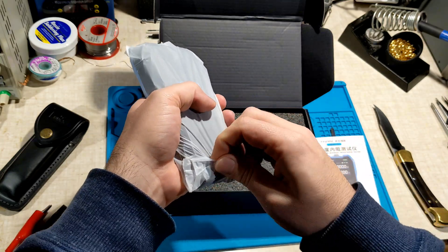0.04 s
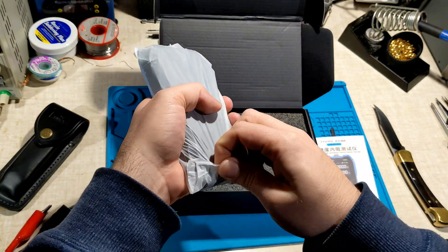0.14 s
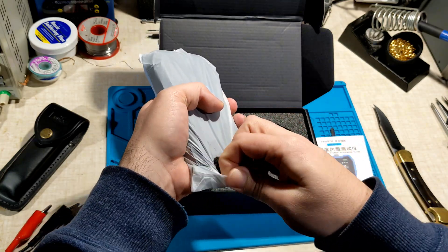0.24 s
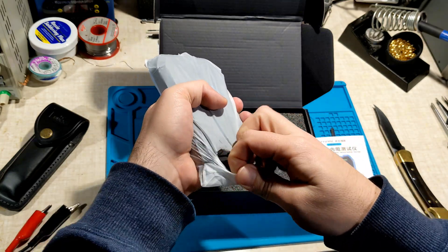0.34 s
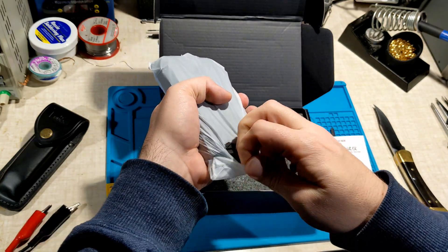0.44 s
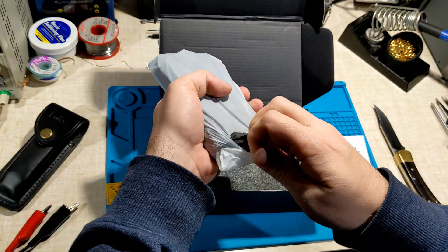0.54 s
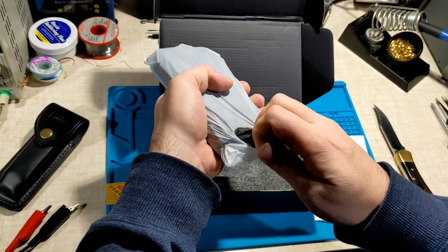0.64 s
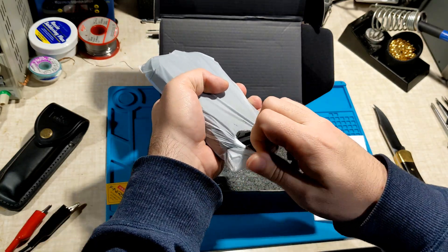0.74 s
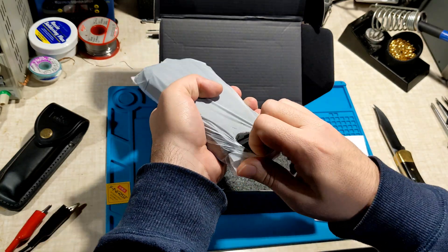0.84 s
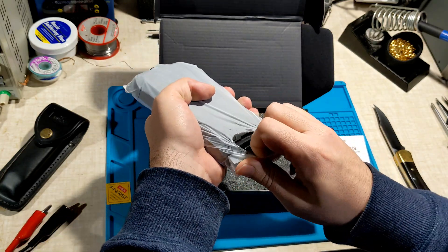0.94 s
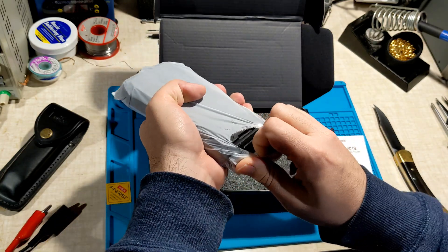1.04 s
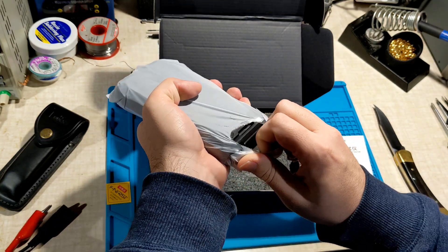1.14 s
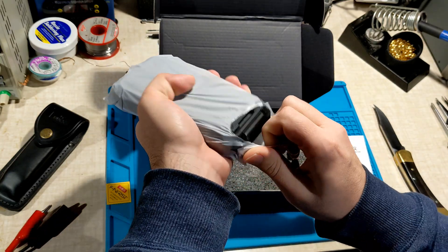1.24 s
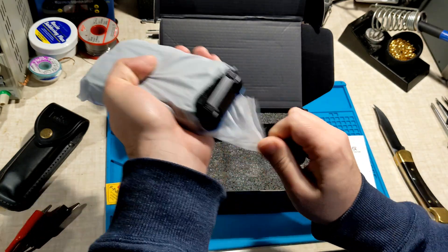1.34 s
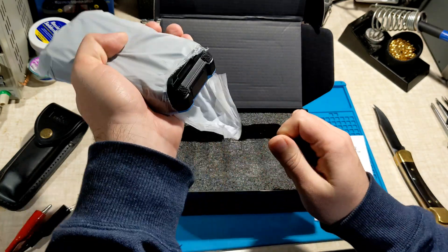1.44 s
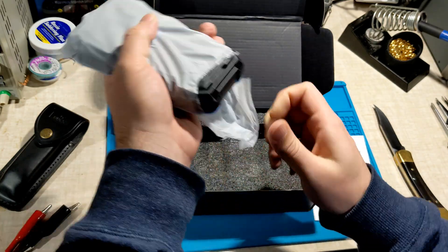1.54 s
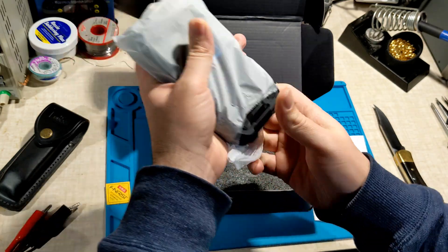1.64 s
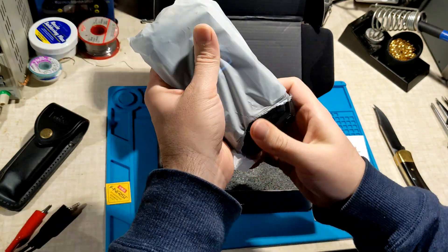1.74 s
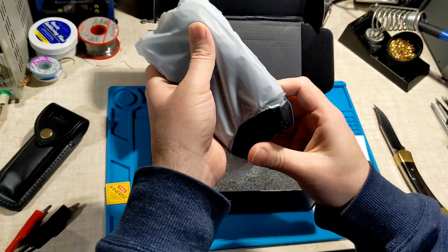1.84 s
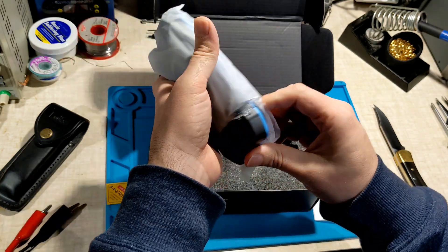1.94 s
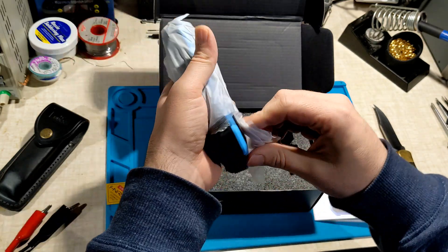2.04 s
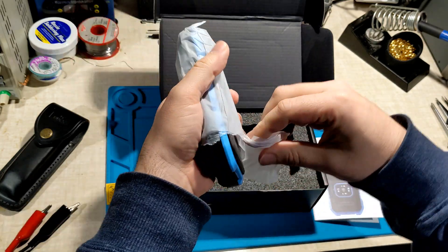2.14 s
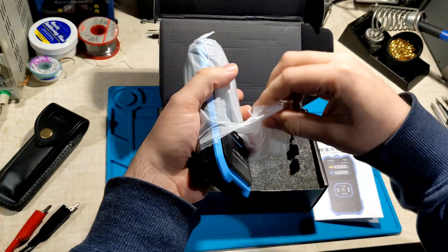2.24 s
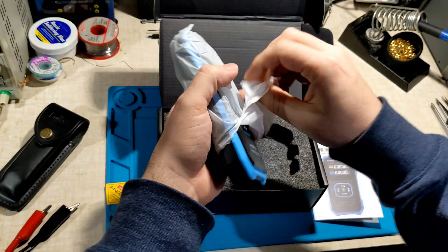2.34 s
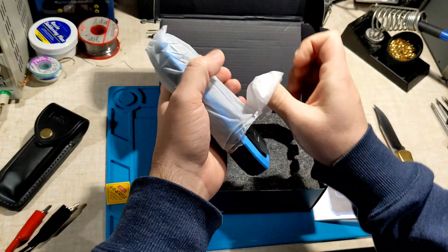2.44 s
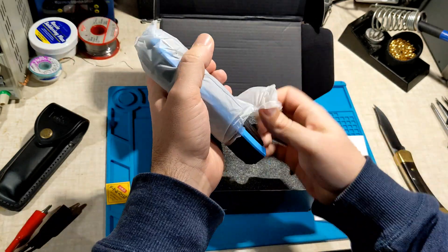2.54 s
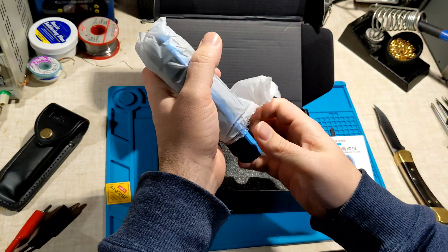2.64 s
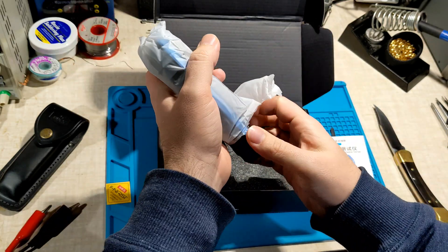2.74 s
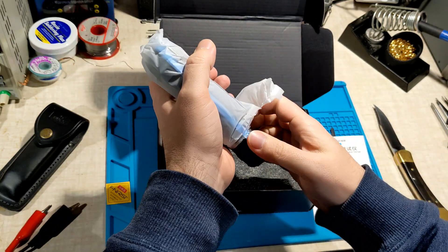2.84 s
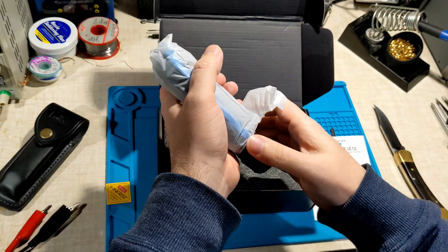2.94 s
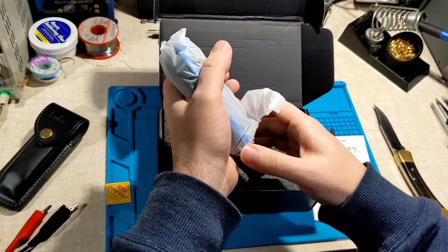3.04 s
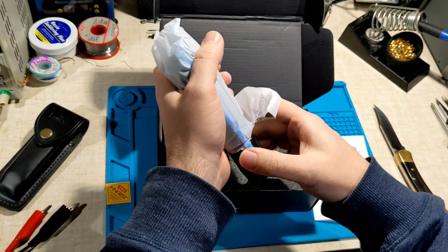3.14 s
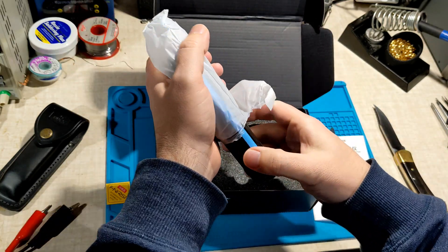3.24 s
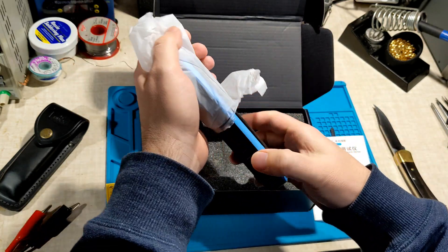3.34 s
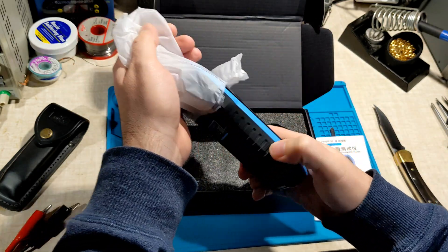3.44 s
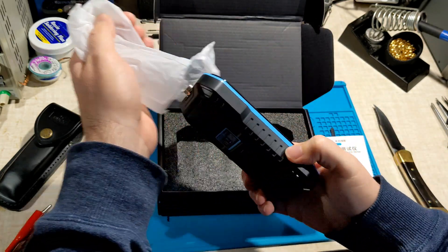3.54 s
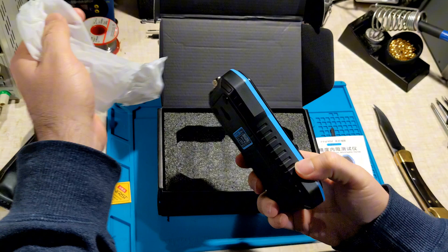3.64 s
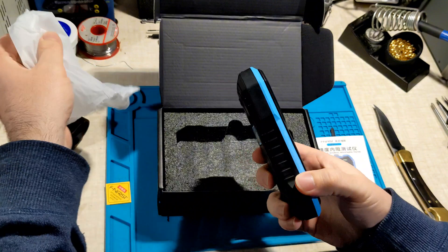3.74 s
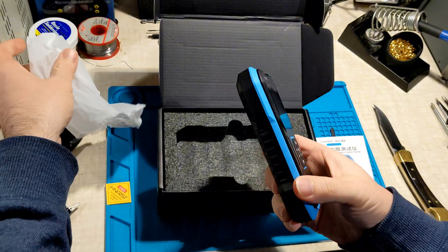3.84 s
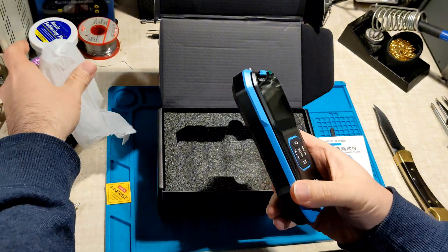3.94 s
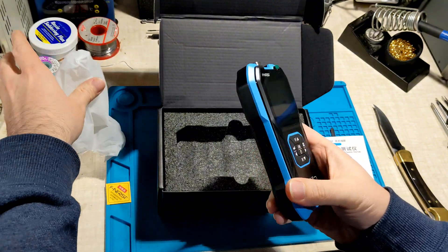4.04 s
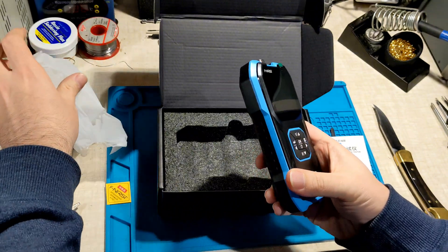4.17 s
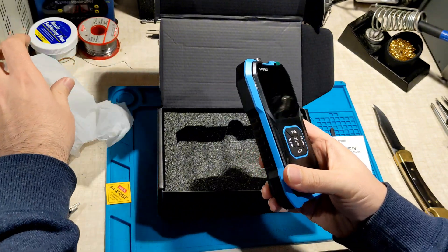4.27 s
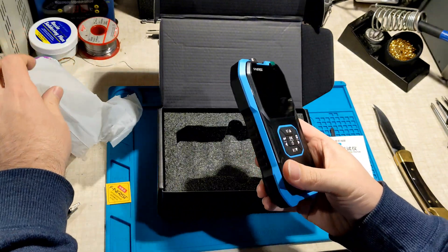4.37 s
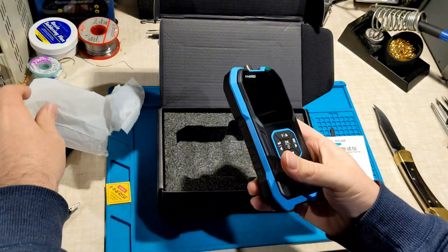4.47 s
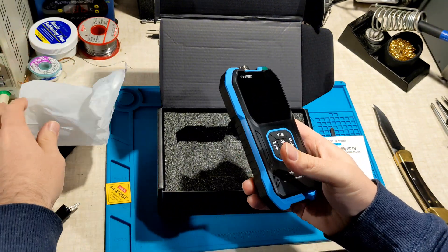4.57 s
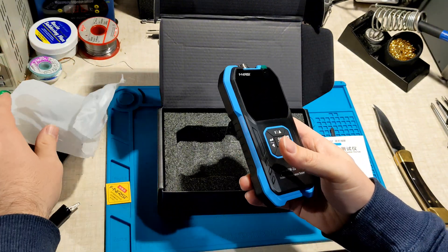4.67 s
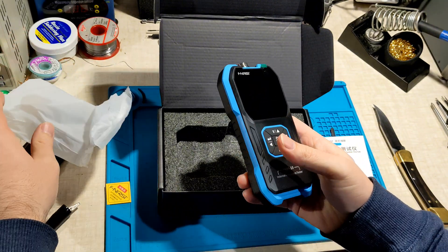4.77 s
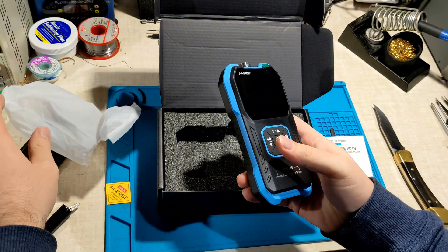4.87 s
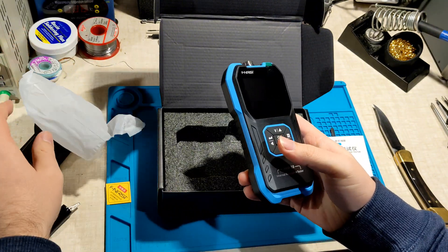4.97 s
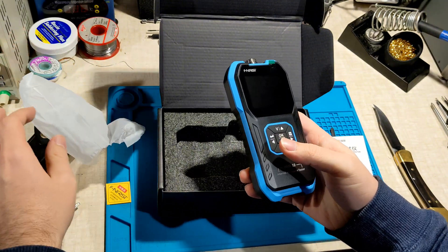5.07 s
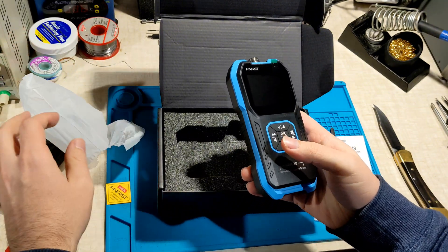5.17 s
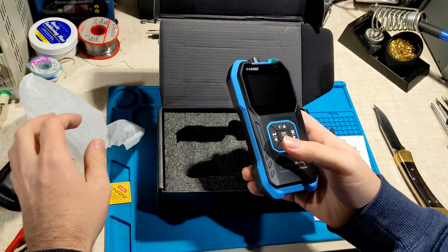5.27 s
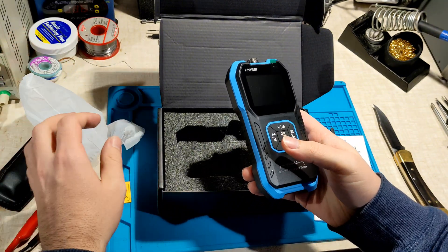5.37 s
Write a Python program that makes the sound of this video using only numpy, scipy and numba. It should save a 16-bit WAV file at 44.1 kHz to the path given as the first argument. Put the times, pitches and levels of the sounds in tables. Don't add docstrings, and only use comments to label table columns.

```python
import sys
import numpy as np
from scipy import signal
from scipy.fft import rfft, irfft, next_fast_len
from scipy.io import wavfile
from scipy.ndimage import uniform_filter1d, map_coordinates
from numba import njit

SR = 44100
rng = np.random.default_rng(int(sys.argv[2]) if len(sys.argv) > 2 else 0)


def makeup_ratio(level_db):
    decades = np.asarray(level_db, float) / 20
    return 10 ** decades


def store_pcm(level_fs):
    pcm = np.round(np.clip(level_fs, -1, 1) * 32767).astype(np.int16)
    wavfile.write(sys.argv[1], SR, np.atleast_2d(pcm).T)


N = 238581
TIME = np.arange(N) / SR

# [f/Hz, level per Hz/dB]
AIR = [(150, -8), (300, -1), (550, 0), (1000, -2), (2200, -1), (7000, -3), (10500, -7), (14000, -4)]
# [t/s, rumble level/dB, drumming level/dB]
LEAN = [(0, -71, -68), (.55, -71.5, -79), (1.05, -80.5, -84.5), (3.1, -80, -82.5), (3.5, -78, -73.5),
        (4.15, -78, -74), (4.3, -79.5, -84), (5.41, -80.5, -80)]
# [f/Hz, width/Hz, level/dB]
BOX = [(218, 25, 2.5), (506, 31, 4), (635, 19, -15), (845, 62, -3.5), (1310, 60, -21), (2250, 30, -8)]
# [t/s, peak level/dB, f/Hz, t60/s]
POPS = [(0.0623, -56, 2230, 0.024), (0.315, -31, 2250, 0.027), (0.3473, -38, 1860, 0.032),
        (0.5905, -37, 1280, 0.035), (1.4177, -28, 1993, 0.06), (2.2712, -39, 2080, 0.053),
        (2.348, -32.5, 1820, 0.027), (2.6274, -38, 2240, 0.021), (3.796, -44.5, 1310, 0.046),
        (3.8353, -43.5, 1356, 0.049), (4.542, -51, 1980, 0.037), (4.5793, -46.5, 2280, 0.042),
        (4.7326, -41, 2244, 0.045), (5.0255, -56, 2330, 0.021)]
# [t/s, peak level/dB, f/Hz, t60/s]
KNOCKS = [
    (0.348, -47, 630, 0.087),
    (0.59, -45, 805, 0.05),
    (1.418, -28, 623, 0.014),
    (1.734, -39, 504, 0.032),
    (2.224, -46, 507, 0.094),
    (2.25, -52, 586, 0.068),
    (2.274, -42, 623, 0.059),
    (2.309, -43, 686, 0.064),
    (2.344, -41.5, 656, 0.044),
]
# [t/s, peak level/dB, f/Hz, t60/s]
MORE_POPS = [(0.259, -49, 2230, 0.025), (0.288, -35, 4020, 0.025), (0.313, -35, 3070, 0.018),
             (0.591, -43, 1050, 0.034), (0.671, -55, 2476, 0.023), (0.771, -50, 4000, 0.025),
             (0.773, -44, 2500, 0.027), (0.858, -42, 3370, 0.023), (0.865, -51, 635, 0.03),
             (0.972, -52, 1328, 0.033), (1.33, -36, 4700, 0.025), (1.361, -29, 1900, 0.02),
             (1.795, -38.5, 2090, 0.027), (1.951, -44.5, 500, 0.021), (2.035, -59, 520, 0.025),
             (2.155, -37.5, 3650, 0.025), (2.222, -48, 535, 0.025), (2.381, -51, 537, 0.06),
             (2.579, -39, 4314, 0.025), (2.791, -55, 3000, 0.025), (2.882, -48, 3500, 0.028),
             (2.916, -49, 3340, 0.04), (2.916, -54, 2380, 0.03), (2.972, -52, 1310, 0.023),
             (3.095, -46, 4730, 0.025), (3.149, -45.5, 2361, 0.033), (3.416, -33.5, 2700, 0.025),
             (3.513, -32, 3120, 0.024), (3.53, -40, 1770, 0.043), (3.626, -48, 4450, 0.025),
             (3.682, -57, 1310, 0.035), (3.773, -54.5, 1380, 0.032), (3.775, -34.5, 4810, 0.028),
             (4.008, -51.5, 1787, 0.033), (4.114, -55, 4700, 0.031), (4.311, -60, 1328, 0.025),
             (4.31, -52, 4620, 0.028), (4.31, -53.5, 2350, 0.034), (5.026, -66, 2030, 0.025),
             (2.189, -51, 575, .03), (2.208, -44, 573, 0.027), (2.35, -40, 910, 0.026),
                (2.34, -37, 767, 0.029), (1.419, -46.5, 253, 0.15), (3.297, -35, 2970, .015),
                (3.494, -34, 3060, 0.021), (3.819, -44, 1470, 0.03), (3.929, -56.5, 520, 0.024),
                (3.947, -55, 1780, .025), (3.9766, -57, 1590, 0.027), (4.0546, -55, 1760, .025),
                (4.557, -57, 3200, .015), (4.565, -55, 840, 0.026), (4.812, -58, 3180, 0.022),
                (4.84, -59, 3160, .02)]
# [f/Hz, level per Hz/dB]
FILM = [(71, -53), (120, -19.5), (237, -19), (440, -15.5), (640, -13.5), (1040, -18), (1330, -8),
        (1560, -9.5), (2190, -3), (6100, -5), (7080, 0), (8000, -1.5), (10600, -4), (11700, 1.5),
        (15500, 2), (16500, -56)]
RANGE_BORDERS = (1050, 4000, 8500)
PORT_BALANCE = (-2.5, 1.5, -2.3, 2.5)
# [t/s, crackle level/dB]
GRIP = [(0, -58.5), (.7, -57.5), (1.13, -60), (1.25, -66.5), (1.55, -61), (2.76, -65), (3.12, -58.5),
        (3.66, -58.5), (4.15, -78), (4.29, -70), (4.69, -75), (5.0, -72), (5.1, -83), (5.41, -85)]
# [t/s, hold/s, crackle level/dB, stiff folds share/dB, wrapped object share/dB]
PULLS = [(.3, 0.049, -42, -2, -7.5), (1.323, 0.029, -33, -15, -26), (1.355, 0.026, -31.5, -12, -10.5),
         (1.419, 0.0039, -37.5, -4.5, -4), (1.47, 0.03, -51.5, -14, -16), (1.596, 0.0078, -34, -10.5, -25),
         (1.65, 0.073, -39, -11.5, -16.5), (1.715, 0.062, -35.5, -12.5, -19),
         (1.82, 0.051, -42.5, -7.5, -15), (1.9, 0.076, -38, -7.5, -22.5), (2.005, 0.079, -40, -8, -15.5),
         (2.135, 0.078, -45, -8.5, -13.5), (2.195, 0.074, -42, -6, -13.5), (2.275, 0.09, -37, -6, -15.5),
         (2.385, 0.052, -41, -10, -13.5), (2.45, 0.082, -39, -8, -19.5), (2.59, 0.058, -45, -9, -17.5),
         (3.17, 0.023, -37.5, -18.5, -31), (3.205, 0.16, -36.5, -14, -30.5),
         (3.38, 0.096, -35.5, -11.5, -27.5), (3.5, 0.044, -37.5, -9, -23.5),
         (3.56, 0.029, -46.5, -3.5, -15)]
# [t/s, hold/s, crackle level/dB, stiff folds share/dB, wrapped object share/dB]
FUMBLES = [(.06, 0.018, -50, 5.5, -4.5), (.15, 0.071, -54.5, -2, -4.5), (.44, 0.025, -49.5, -9.5, -28),
           (.5, 0.12, -58.5, 2.5, -1), (.775, 0.022, -64, -5, -20), (.85, 0.11, -58.5, -0.5, -5),
           (1.16, 0.022, -60.5, -3.5, -8.5), (2.8, 0.012, -49, -8, -45), (2.91, 0.096, -51, -16, -32),
           (3.72, 0.044, -56.5, -4, -22), (3.79, 0.081, -49.5, -5.5, -23), (3.9, 0.18, -58, -5, -16.5),
           (4.147, 0.0064, -58, 1, -12), (4.45, 0.039, -61, -19, -12.5), (4.54, 0.028, -53, -3.5, -13),
           (4.6, 0.048, -74.5, 6, -3), (4.71, 0.023, -61.5, -1.5, -26), (4.75, 0.09, -76.5, 7, -11),
           (5.03, 0.026, -66, -22, -9.5)]
# [t/s, hold/s, crackle level/dB, stiff folds share/dB, wrapped object share/dB]
SHIFTS = [
    (0.426, .03, -64, 3, -16),
    (0.814, 0.043, -54, -20, -6.5),
    (1.74, 0.028, -37, -24, -35),
    (2.03, 0.025, -41.5, -7, -29),
    (2.251, 0.017, -36, -14, -11),
    (2.669, 0.056, -52, -8.5, -14),
    (2.876, 0.0091, -54, -5, -38),
    (3.99, 0.017, -57, -20, -25),
    (4.52, 0.028, -61, -17, -23),
    (4.81, 0.033, -77, 3.5, -4),
]
# [t/s, half length/s, level/dB]
LULLS = [(0.565, 0.01, -7), (0.758, .009, 3.5), (0.864, 0.027, -4.5), (1.106, .01, -6), (1.222, 0.012, -8),
         (1.255, .015, -3), (1.401, 0.0063, 3), (1.432, .005, -3), (1.576, 0.0083, -7),
         (1.654, 0.013, -4.5), (1.812, 0.013, -5.5), (1.85, 0.022, -2.5), (2.103, 0.011, -9.5),
         (2.367, 0.0081, -12), (2.418, 0.0078, -3.5), (2.203, 0.003, -7), (2.534, 0.049, 1),
         (3.658, 0.024, -2), (4.683, .015, -2)]
# [t/s, finest film peak level/dB, film share/dB, stiff folds share/dB]
PICKING = [(0.0294, -35, -1.5, -10), (0.062, -26.5, -26, -4.5), (0.1062, -31, -12, -18),
           (0.139, -35.5, -17, -2.5), (0.2486, -32, 1, -2), (0.2611, -33.5, 1, -3), (0.2883, -31, 2, -15),
           (0.316, -25, -3, -7), (0.399, -32.5, -14, -18), (0.5318, -37.5, -13, 0),
           (0.551, -31.5, -23, -2.5), (0.575, -34.5, -13, 0), (0.5903, -23.5, -11, -15),
           (0.621, -40, -1, -8), (0.6461, -34.5, -3, -13), (0.7021, -37, -8, -10), (0.7286, -33.5, -6, -17),
           (0.7725, -26, -7, -15), (0.856, -38, 0, -8), (0.865, -32, -12, -24), (0.887, -37.5, -10, -17),
           (0.9029, -31.5, -3, -10), (0.936, -37, -14, -2.5), (0.949, -34.5, -4, -11),
           (0.971, -39, -5, -21), (1.0324, -37, -19, -12), (1.079, -37.5, -4, -19),
           (1.1177, -29.5, -10.5, -27), (1.16, -44, -13, -1.5), (1.1718, -39.5, -1, -13.5)]
# [t/s, finest film peak level/dB, film share/dB, stiff folds share/dB]
TEARING = [(1.193, -43.5, 3, -27), (1.2460, -32.5, -12.5, -19), (1.2976, -33, -27, -16),
           (1.716, -25, -11, -20), (1.3300, -21, -14, -15), (1.355, -14, -26, -34), (1.4032, -13, -25, -26),
           (1.4192, -19, -3, -6), (1.4206, -13.5, 0, -9), (1.5457, -45.5, -6, -1.5), (1.589, -32, -14, -23),
           (1.5966, -18.5, -24, -12), (1.604, -18, -29, -17), (1.6868, -29.5, -18, -7),
           (1.7038, -18.5, -16, -13), (1.836, -37, 4, -10), (1.8906, -27, -19, -17), (1.915, -49, 0, -7),
           (1.9611, -25, 1, -7), (2.065, -29, 8, -8), (2.127, -34, -4, -26), (2.138, -26, -13, -24),
           (2.1866, -28, 2, -19), (2.2215, -22.5, -5, -23), (2.239, -22.5, -5, -21), (2.2693, -18, -6, -20),
           (2.4212, -25, -0.5, -9.5), (2.4626, -34, 6, -31), (2.58, -27.5, -3, -18),
           (2.629, -21.5, -24, -15), (2.716, -32, -10, -22)]
# [t/s, finest film peak level/dB, film share/dB, stiff folds share/dB]
LAYING = [(2.7902, -34, 3, -14), (2.8212, -29.5, -13, -26), (2.828, -22.5, -31, -23), (2.901, -42, -4, -28),
          (2.925, -35, -1, -28), (2.9699, -35.5, -33, -5), (2.9945, -31.5, -17, -27),
          (3.0078, -26.5, -26, -21), (3.093, -34.5, -10, -31), (3.1663, -50, -12, -6),
          (3.5142, -21, -25, -19), (3.627, -49, 6, 0), (3.6991, -34, 0.5, -38), (3.773, -43, 6, 3),
          (3.795, -29, -16, -22), (3.8182, -47, -7, -4), (3.8312, -35, 1, -4.5), (3.928, -46.5, 2, -4),
          (3.9759, -45, 1, -10), (4.1117, -51, 13, 6.5), (4.1424, -44, 5.5, -5.5), (4.311, -41.5, -6, -14),
          (4.429, -47, -18, -9), (4.444, -39.5, -16, -10.5), (4.541, -41, -17, -6), (4.5822, -45, -6, -3),
          (4.61, -46, 0, -2), (4.7002, -43, -23, -8), (5.0266, -56, 0, 4)]
# [t/s, finest film peak level/dB, film share/dB, stiff
# folds share/dB]
MORE_SNAPS = [(0.2754, -32, -8, -4), (0.3224, -20, -17, -26), (0.753, -41, -17, 0), (0.819, -43, -15, -20),
              (1.013, -45, 1, -5), (1.1326, -37, -8, -23), (1.491, -38, -19, -9.5), (1.75, -19, -10, -25),
              (1.7947, -40.5, 13, -4), (1.849, -33.5, -15, -5), (1.9251, -37, 1, 2.5), (2.0014, -30, -20, -17),
              (2.048, -33.5, 5, -5), (2.2044, -25.5, -1, -15), (2.334, -29, -3, -5), (2.3503, -26, -2, -3),
              (2.3545, -27.5, -4, -14), (0.7315, -37, -6, -15), (0.779, -31, -10, -8), (3.3088, -33, -14, -9),
              (3.3934, -25, -14, -15), (3.4459, -18, -21, -13), (3.492, -21.5, -20, -17), (4.237, -62, 9, 7),
              (4.3576, -60, -10, 1), (5.0645, -50.5, -14, -5),
              (0.0546, -28, -21, -23), (0.1194, -44, -18, -15), (0.3045, -36, -17, 5), (0.3608, -27.5, -9, -20),
               (0.6254, -45, -1, -13), (0.777, -32, -11, -7.5), (0.9085, -43, -7, -3), (0.9189, -58, -4, -10),
               (0.9751, -32.5, -7, -10), (1.211, -55, 4, -3), (1.371, -21, -18, -17), (1.514, -47, 3, -17),
               (1.527, -50.5, 1, 2), (1.669, -30, -17, -18), (1.713, -27, -20, -12), (1.732, -26, -18, -9),
               (2.018, -24, -17, -15), (2.29, -25, -4, -11), (2.473, -31, -1, -23), (2.479, -26.5, 1.5, -20),
               (2.6396, -27.5, -26, -5), (3.208, -35, -13, -16), (3.298, -39, -4, -8), (3.323, -32, -4, -5),
               (3.405, -43, -11, -16), (3.417, -28, -9, -7), (3.46, -33, -8, -10), (3.472, -33, -8, -18),
               (3.543, -33, -14, -15), (4.148, -51, 4, -2), (4.674, -57, -6, 3), (4.788, -65, -6, 3)]

PLACE_DB = -1
PORT_LAG, PORT_OFFSET = 5., -3.


def level(x, db):
    return x * makeup_ratio(db) / np.sqrt(np.mean(x ** 2))


def band(x, lo_hz, hi_hz):
    return signal.sosfilt(signal.butter(2, [lo_hz, hi_hz], "bandpass", fs=SR, output="sos"), x)


def colour(x, points):
    size = next_fast_len(N)
    spec, (hz, db) = rfft(x, size), np.transpose(points)
    own = uniform_filter1d(np.mean(abs(spec) ** 2, axis=0), size=2000)
    bin_hz = np.arange(spec.shape[1]) * SR / size
    want = makeup_ratio(np.interp(np.log(bin_hz + 1), np.log(hz), db))
    return irfft(spec * want / np.sqrt(own), size)[:, :N]


def walk(rate):
    hold = int(SR / rate)
    steps = np.repeat(rng.standard_normal(size=1500), hold)[:N]
    return 0.74 * uniform_filter1d(steps, hold)


def sides(pan_db):
    return makeup_ratio(np.array([pan_db, -pan_db]) / 2)


def ranges(x, gains):
    size = next_fast_len(N)
    bin_hz = np.arange(size // 2 + 1) * SR / size
    below = [1 / (1 + (bin_hz / hz) ** 4) for hz in RANGE_BORDERS]
    shares = np.diff([0 * bin_hz, *below, 1 + 0 * bin_hz], axis=0)
    port_gains = np.array(gains) * sides(np.array(PORT_BALANCE)).T[:, :, None]
    out = 0
    for share, gain in zip(shares, port_gains):
        rms = np.sqrt(np.mean(irfft(rfft(x, size) * share, size) ** 2))
        out = out + rfft(x * gain, size) * share / rms
    return irfft(out, size)[:, :N]


@njit
def grains(start, hz, t60, gain, lag, phase):
    out = np.zeros((2, N + 8192))
    for g in range(len(start)):
        turn = np.exp(complex(-np.log(1000.) / (t60[g] * SR), 2 * np.pi * hz[g] / SR))
        for c in range(2):
            i = int(max(start[g] + (c - .5) * lag[g], 0.))
            z = np.exp(1j * phase[g])
            for k in range(min(int(t60[g] * SR), 8000)):
                out[c, i + k] += gain[c, g] * z.imag
                z *= turn
    return out[:, :N]


def quiet(body_db):
    hiss = level(band(colour(rng.standard_normal((2, N)), AIR), 110, 21000), -73)
    s, rumble_db, rest_db = np.transpose(LEAN)
    follow_db = 0.23 * (uniform_filter1d(body_db, size=SR // 3) + 65.5)
    drum_db = np.interp(TIME, s, rest_db) + follow_db
    mid, side = rng.standard_normal((2, N))
    shake = mid + 0.46 * side * np.array([[1], [-1]])
    rumble = level(band(shake, 38, 113), 1.9) * makeup_ratio(np.interp(TIME, s, rumble_db) + 2.1 * walk(10))
    drum = level(band(shake, 209, 275), -0.85) * makeup_ratio(drum_db + 0.38 * walk(26))
    return hiss + (rumble + drum) * sides(np.array([-1.4]))


def room(x):
    t60_s, tail_db = 0.12, -6.5
    t = TIME[:SR // 2]
    mid, side = rng.standard_normal((2, len(t))) * makeup_ratio(-60 * t / t60_s) * (t > .0015)
    tail = mid + band(side, 1500, 19000) * np.array([[1], [-1]])
    tail *= makeup_ratio(tail_db) / np.sqrt(np.sum(tail ** 2, axis=1, keepdims=True))
    return signal.fftconvolve(x, tail, axes=1)[:, :N]


def box(x):
    modes = [makeup_ratio(db) * signal.lfilter(*signal.iirpeak(hz, hz / width, SR), x) for hz, width, db in BOX]
    return makeup_ratio(-2) * sum(modes)


def pops(count=3):
    s, peak_db, hz, t60 = np.transpose(POPS + KNOCKS + MORE_POPS)[:, :, None]
    detune, delay = rng.random((len(s), count, 2)).transpose(2, 0, 1)
    rank = np.arange(count)
    pitch = hz * (1 + 0.14 * rank * (detune - .5))
    start = (s + 0.00199 * rank * delay) * SR
    gain = makeup_ratio(peak_db - 6.5 - 2.0 * rank).ravel() * sides(np.array([-1.5]))
    ring_s = np.repeat(np.clip(0.96 * t60, .005, .1), count)
    zero = np.zeros(gain.shape[1])
    return grains(start.ravel(), pitch.ravel(), ring_s, gain, zero + PORT_OFFSET, zero)


def crackle(count, scatter_db, cycles, patchy_db):
    u = rng.random((count, 6)).T
    start, hz = u[0] * (N - 1), 300 * 50 ** u[1] ** .5
    patches = rng.standard_normal(size=(12, 400))
    where = [np.log2(hz / 300) * 1.642, start / SR * 35]
    local = map_coordinates(patches, where, order=1, mode="wrap")
    swarm = (.15 * walk(45) + .8 * walk(260))[start.astype(int)] + .9 * local
    sliding = (start > 3.14 * SR) & (start < 3.62 * SR)
    even = np.where(sliding, .3, 1)
    large = np.minimum(-np.log(u[2]), 3.5 + 2 * even)
    size = makeup_ratio(scatter_db * large + patchy_db * swarm * even)
    side = makeup_ratio(15.0 * (u[3] - .5) * np.minimum(hz / 2500, 1) * np.array([[1], [-1]]))
    lag = PORT_OFFSET + 2.5 * PORT_LAG * (u[4] - .5)
    phase = np.pi * (u[5] > .5)
    return colour(grains(start, hz, cycles / hz, size * side, lag, phase), FILM)


def effort():
    t = TIME[::64]
    grip_db = np.interp(t, *np.transpose(GRIP))
    power = makeup_ratio(grip_db + np.array([[0], [-7], [-13]])) ** 2
    for moves, rise, fall in ((PULLS, 778, 301.5), (FUMBLES + SHIFTS, 523, 324)):
        for s, hold, db, fold_db, body_db in moves:
            shape_db = db - rise * np.maximum(s - t, 0) - fall * np.maximum(t - s - hold, 0)
            power = power + makeup_ratio(shape_db + np.array([[0], [fold_db], [body_db]])) ** 2
    lull_db = sum(db * np.exp(-((t - s) / half) ** 4) for s, half, db in LULLS)
    return [np.interp(TIME, t, 10 * np.log10(p) + lull_db) for p in power]


def rustle(top_db, fold_db, body_db):
    film = crackle(count=80000, scatter_db=2.5, cycles=3.94, patchy_db=3.0)
    range_db = (body_db - 8.0, fold_db - 5.0, top_db - 10, top_db - 4.5)
    return ranges(film, [makeup_ratio(db) * sides(np.array([PLACE_DB])) for db in range_db])


def snaps():
    film = crackle(count=90000, scatter_db=1.1, cycles=3.05, patchy_db=0.7)
    s, peak_db, film_db, fold_db = np.transpose(PICKING + TEARING + LAYING + MORE_SNAPS)
    crack = 4.5
    for port, lag in zip(film, (1, -1)):
        at = (s * SR + 40 + lag).astype(int)
        port[at] += crack * port.std()
        port[at + 1] -= 0.71 * crack * port.std()
    pan_db = PLACE_DB + 1 * rng.standard_normal(len(s))
    lead = SR // 100
    t = TIME[:SR // 8] - lead / SR
    after = np.maximum(t, 0)
    decay = makeup_ratio(-60 * after / .008) + makeup_ratio(-13 - 60 * after / .05)
    burst = np.minimum(after / 0.00096, 1) * decay
    burst = burst + makeup_ratio(-19.5 - 60 * abs(t) / 0.016)
    crest_db = 6
    gains = []
    for share_db in (fold_db - 17.0, fold_db, film_db, 0 * s):
        power = np.zeros((2, N))
        power[:, (s * SR).astype(int)] = (makeup_ratio(peak_db + share_db - crest_db) * sides(pan_db)) ** 2
        spread = signal.fftconvolve(power, burst[None] ** 2, axes=1)[:, lead:N + lead]
        gains.append(np.sqrt(abs(spread)))
    return ranges(film, gains)


def scene():
    top_db, fold_db, body_db = effort()
    bag = rustle(top_db, fold_db, body_db) + snaps() + pops()
    bag = band(bag + box(bag), 130, 14070)
    return bag + room(bag) + quiet(body_db)


def band_limit(x):
    return signal.sosfilt(signal.butter(12, 16620, fs=SR, output="sos"), x)


def record(dry):
    limit, top_hz = .2, 15750
    rounded = limit * np.tanh(dry / limit)
    cut = signal.sosfilt(signal.cheby2(12, 28, top_hz + 200, fs=SR, output="sos"), rounded)
    cut = signal.sosfilt(signal.butter(2, 30, "highpass", fs=SR, output="sos"), cut)
    return band_limit(cut)


dry = scene()
out = record(dry)
store_pcm(out)
```